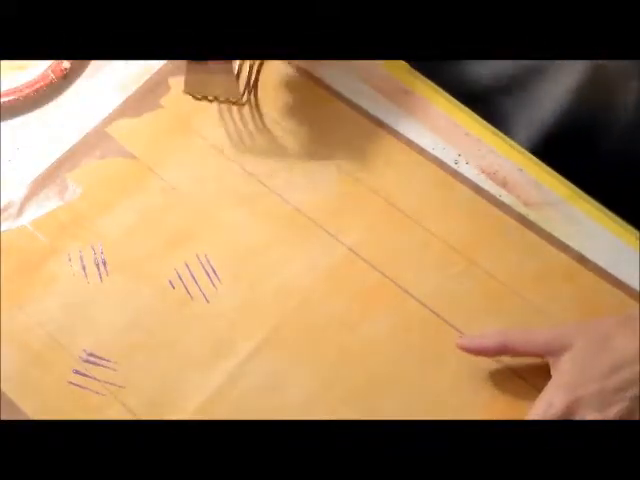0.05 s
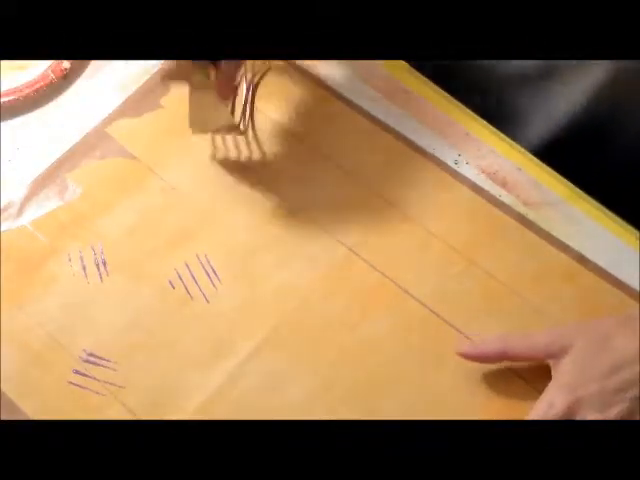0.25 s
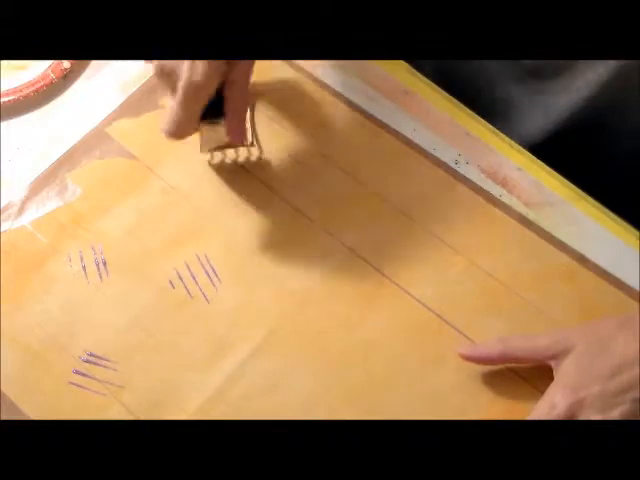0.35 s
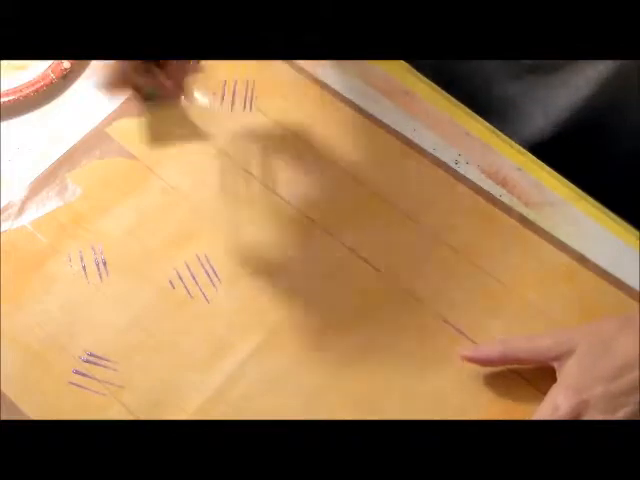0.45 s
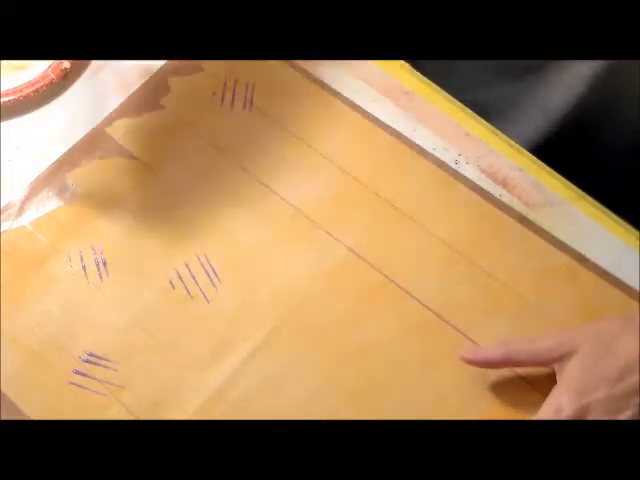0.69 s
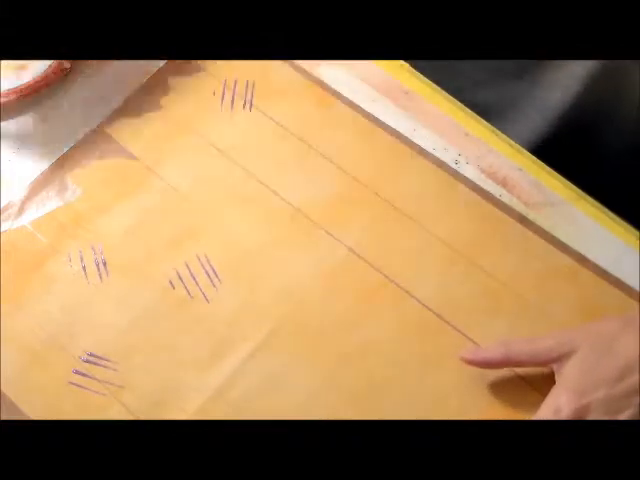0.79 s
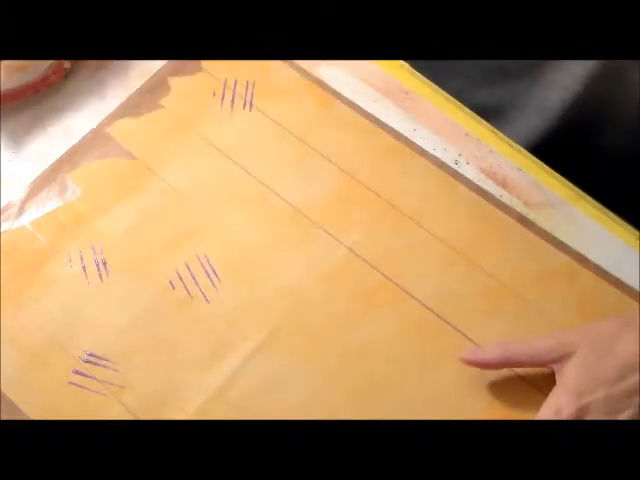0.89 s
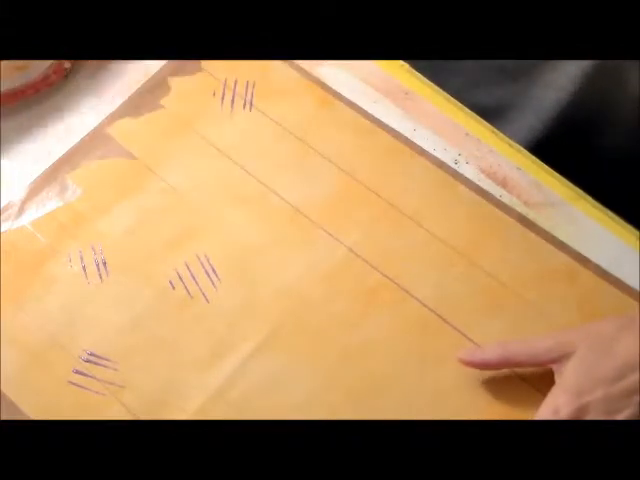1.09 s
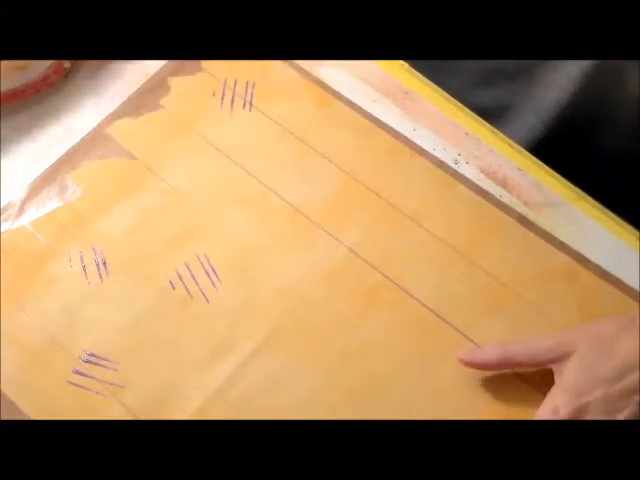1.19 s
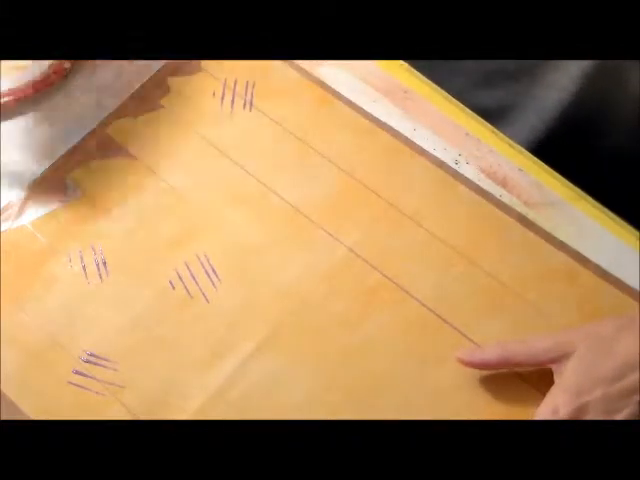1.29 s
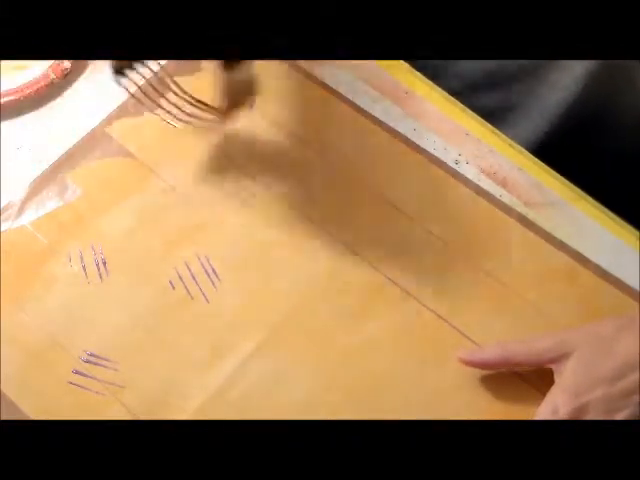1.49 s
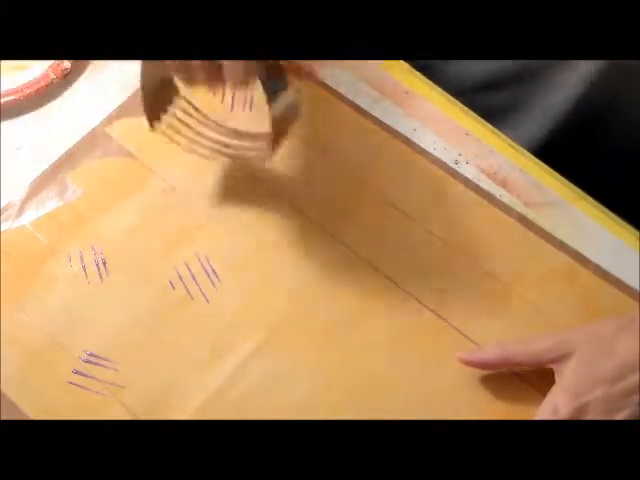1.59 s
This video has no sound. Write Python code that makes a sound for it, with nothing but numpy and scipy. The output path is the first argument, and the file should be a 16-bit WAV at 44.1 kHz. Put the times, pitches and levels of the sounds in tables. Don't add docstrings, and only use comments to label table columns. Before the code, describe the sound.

Dull thud of a wire hand tool on a papered table, then two sharp metallic clacks indoors

```python
import sys
import numpy as np
from scipy import signal
from scipy.io import wavfile
from scipy.ndimage import uniform_filter1d

SR = 44100
rng = np.random.default_rng(int(sys.argv[2]) if len(sys.argv) > 2 else 0)


def pcm_store(signal):
    levels = np.round(np.clip(np.atleast_2d(signal), -1, 1) * 32767)
    wavfile.write(sys.argv[1], SR, levels.astype(np.int16).T)


def magnitude_from_level(level_db):
    exponent = np.asarray(level_db, float) / 20
    return 10 ** exponent


N = 72765

# (frequency [Hz], level [dB per Hz])
AIR_COLOUR = [(15, -20.5), (25, 4.5), (191, -15.5), (219, -17), (335, -17.5), (394, -22.5), (5420, -34.5),
              (13500, -37), (15000, -33)]
AIR_DB, HISS_EDGE_HZ = -51, 14300
# (frequency [Hz], likeness [0-1])
AIR_LIKENESS = [(30, 0.83), (300, 0.44), (1400, 0.21), (3500, 0.11), (7000, 0.031), (15000, 0.022)]
# (frequency [Hz], left minus right [dB])
AIR_LEAN = [(30, 10), (200, 3), (400, 0), (1000, 0.2)]
# (time [s], level [dB])
ARM_LEANING = [
    (0, 1),
    (.12, 2),
    (.3, 1.5),
    (.47, 6.5),
    (.6, -0.5),
    (.85, -0.5),
    (1.05, 1),
    (1.5, 5.5),
    (1.62, 1),
]
LEANING_HZ = 138
# (time [s], level [dB])
HUM_SWELL = [(0, -76), (.5, -75), (.75, -62), (1.05, -64), (1.2, -68), (1.65, -75)]
HUM_HZ, HUM_WIDTH_HZ = 337, 6.2
# (time [s], length [s], level [dB], centre [Hz])
RUSTLES = [(0.11, 0.11, -67, 3700), (1.182, 0.04, -57, 3600), (0., 0.055, -59, 2200),
           (.595, 0.028, -54, 2300), (.208, .035, -52, 3200), (1.185, .035, -62, 9000)]
# (time [s], level [dB])
LENS_STEPS = [(0.034, -52.5), (0.146, -66), (0.288, -62), (0.433, -55), (0.901, -53.5), (0.9663, -56.5),
              (1.035, -55), (1.167, -58), (1.233, -55.5), (1.6346, -53.5)]
# (frequency [Hz], level [dB], time to fall 60 dB [s])
LENS_MODES = [(2860, 4, 0.038), (3866, -9, 0.1)]
# (start [s], end [s], start pitch [Hz], end pitch [Hz], level [dB])
LENS_WHINE = [
    (0.035, 0.205, 5410, 5300, -73),
    (0.243, 0.355, 5330, 5290, -71.5),
    (0.635, 1.027, 5380, 5230, -71),
]
# (time [s], level [dB], frequency [Hz], time to fall 60 dB [s], left minus right [dB])
TICKS = [(0.2051, -38, 3900, 0.006, 2), (0.417, -48, 3500, 0.0036, -3), (.4195, -55, 4840, .02, 0),
         (0.441, -58, 4340, 0.077, 3.5), (0.454, -49, 3500, 0.0046, 0), (.455, -50.5, 9100, 0.0046, 0),
         (0.461, -57, 9500, .006, 0), (0.5303, -43, 4100, .006, 2), (.5305, -44, 4700, .006, 1),
         (0.5942, -36.5, 3110, .022, -2), (0.5943, -42.5, 2470, 0.017, 3), (0.594, -38.5, 4660, .01, 1),
         (.596, -44.5, 1790, 0.016, 3), (0.6018, -41.5, 2920, 0.021, 0), (0.6023, -46, 4160, 0.012, 0),
         (0.602, -45.5, 1685, 0.015, 0), (0.608, -48, 3200, 0.01, 0), (0.6335, -38, 2830, .011, 6),
         (0.6328, -44, 3750, 0.008, 16), (0.6323, -44, 4600, 0.0067, 4), (.6336, -49, 6000, .004, 4),
         (0.6479, -42, 11740, .005, -5), (0.6477, -42, 14200, .003, -11), (0.65, -50, 10800, 0.0053, -5),
         (1.0881, -42, 3300, .008, 2), (1.0888, -38, 3780, 0.01, 2), (1.091, -42, 4530, .008, 2),
         (1.0984, -31, 4700, .008, 2), (1.1113, -36, 4660, .006, 0), (1.3254, -41, 10400, 0.0052, 0),
         (1.336, -40, 9450, .005, 0), (1.3464, -38, 6960, .006, 0), (0.2143, -43, 3720, .012, 0),
         (1.319, -27, 1740, .03, 0), (1.3187, -33, 4950, .012, 0), (1.203, -55, 4050, .02, 0),
         (1.1866, -43.5, 3350, 0.0076, 0), (1.185, -53, 1810, 0.011, 0)]
TICK_AIR_DB, TICK_ROOM_DB = -26, -13
# (time [s], table level [dB], push length [s], crack level [dB], brightness [Hz])
TAPS = [
    (0.2112, -22.5, 0.0019, -31.5, 1400),
    (1.0922, -28.5, 0.00099, -27, 17700),
    (1.318, -22.5, 0.00058, -26, 17200),
]
# (frequency [Hz], level [dB], time to fall 60 dB [s], left minus right [dB])
PAPER_MODES = [(108.5, -3, 0.055, 11.5), (198, -19.5, .28, 8), (217.7, -10.5, 0.22, 6),
               (366, -24.5, 0.21, -3), (412, -2.5, 0.09, 5), (472, -4, 0.15, -2), (539, -9, 0.12, 4),
               (660, -13, 0.25, 8), (750, -5, 0.06, 1), (910, -18, .07, -1), (1116, -13, 0.067, -4),
               (1210, -2, 0.091, -5)]
PLATE_MODES = [(113, -0.5, 0.063, 13), (172.6, 0, 0.072, 5.5), (347, -17, 0.12, 3), (444.7, 0, .08, 3.5),
               (515, -7, 0.18, -1), (598, -12, 0.14, -4), (722, -1.5, 0.048, 1), (780, -5, .1, -3),
               (978, -21, 0.14, -6), (1117, -14, 0.099, -2), (1640, -23, 0.17, -2)]
RIM_MODES = [(109.3, -1.5, 0.082, 7.5), (168.3, -1.5, 0.11, 10), (193.6, -2.5, 0.09, 3), (203, -17, .3, 3),
             (232, -13.5, 0.15, 5), (362, -8, 0.09, 5), (465, 4, 0.05, 2), (500, -22, .4, 2),
             (573, -13, .14, 3), (729, -6.5, 0.061, -2), (771, -16, .14, -1), (1010, -12, 0.074, -1),
             (1190, -12, 0.05, 3), (1640, -28, 0.12, 2)]
PUSH_RISE_S = 0.00039
REBOUND_S, REBOUND_DB = 0.0166, -8.5
# (frequency [Hz], level [dB], time to fall 60 dB [s])
ROCK_MODES = [(35.78, -19.5, 0.64), (45.6, 1, 0.15)]
ROCK_DB = [-12.5, -18, -13.5]
ROCK_LATE_S, ROCK_RISE_S, ROCK_RIGHT_LEAD_S, ROCK_LEAN_DB = 0.0053, 0.014, 0.0028, 12.5
# (frequency [Hz], level [dB], time to fall 60 dB [s])
TINE_MODES = [(1827, 9, 0.016), (2580, -5, .012), (2855, -2, 0.012), (3316, 12.5, 0.0084),
              (4400, 3.5, 0.014), (4990, -4.5, 0.012), (8840, -1.5, 0.013), (9900, -2.5, 0.0065),
              (11000, -3, .008)]
# (frequency [Hz], level [dB])
SNAP_COLOUR = [(900, -4), (1350, -1), (1800, -1), (2400, -4), (4800, -1), (6300, -12.5), (9800, 0),
               (15000, -11)]
RING_DB = [-18, -5, -4]
SMACK_DB = [14.5, 19, 20]
LANDING_S, CHATTER_S, CHATTER_DB, SNAP_DB = 0.003, 0.017, -12, -7
LEFT_LAG = 1
# (time [s], level [dB])
TINE_CONTACTS = [(1.0932, -33), (1.0942, -34), (1.0973, -43.5), (1.099, -44), (1.3181, -36.5), (1.32, -31),
                 (1.3248, -54)]
CONTACT_RISE_S = 0.0006
# (frequency [Hz], time to fall 60 dB [s])
ROOM_DECAY = [(200, 0.36), (1000, 0.27), (3000, 0.18), (7000, 0.18), (14000, 0.11)]
# (frequency [Hz], likeness [0-1])
ROOM_LIKENESS = [(300, 0.93), (2500, 0.84), (6000, 0.21), (14000, 0.17)]
ROOM_DB = 0
# (time [s], length [s], level [dB], start pitch [Hz], end pitch [Hz])
SETTLES = [
    (.228, .026, -41, 410, 465),
    (.255, .032, -46, 425, 430),
    (.25, .032, -50, 765, 770),
    (.287, .026, -53, 450, 470),
    (1.119, .044, -40.5, 445, 440),
    (1.347, .062, -37, 435, 475),
    (1.424, .024, -49, 480, 495),
]
DUCK_S, DUCK_DB, DUCK_FALL_S, RECOVER_S = 1.339, -7, 0.16, 9.1
BASS_CUT_HZ, EDGE_HZ = 16.5, 14500


def read(points, hz):
    f, value = np.transpose(points)
    return np.interp(np.log(hz + 1), np.log(f + 1), value)


def evened(x):
    return x / np.sqrt(np.mean(x ** 2) + 1e-20)


def add(mix, s, sound):
    part = mix[..., round(s * SR):][..., :sound.shape[-1]]
    part += sound[..., :part.shape[-1]]


def ring(hz, db, t60, length=.4):
    t = np.arange(int(length * SR)) / SR
    return magnitude_from_level(db - 60 * t / t60) * np.sin(2 * np.pi * hz * t)


def glide(hz):
    return np.sin(2 * np.pi * np.cumsum(hz) / SR)


def sides(lean_db):
    return magnitude_from_level(np.array([[.5], [-.5]]) * lean_db)


def pair(same, shape_db):
    a, b, c, d = rng.standard_normal((4,) + shape_db.shape)
    same = np.clip(same, 0, 1)[:, None]
    left = a + 1j * b
    right = same * left + np.sqrt(1 - same ** 2) * (c + 1j * d)
    return np.array([left, right]) * magnitude_from_level(shape_db)


def air():
    hz = np.fft.rfftfreq(2048, 1 / SR)
    patches = rng.standard_normal((1025, N // 512 + 5))
    patches = evened(uniform_filter1d(uniform_filter1d(patches, 20, 0), 5, 1))
    arm_db = np.interp(np.arange(patches.shape[1]) * 512 / SR, *np.transpose(ARM_LEANING))
    stir_db = arm_db / (1 + (hz[:, None] / LEANING_HZ) ** 4)
    z = pair(read(AIR_LIKENESS, hz), read(AIR_COLOUR, hz)[:, None] + 1.25 * patches + stir_db)
    z = z * magnitude_from_level(np.array([.5, -.5])[:, None, None] * read(AIR_LEAN, hz)[:, None])
    z = z * (hz < HISS_EDGE_HZ)[:, None]
    noise = signal.istft(z, nperseg=2048, noverlap=1536)[1][:, :N]
    return magnitude_from_level(AIR_DB + 4.0) * evened(noise)


def hum():
    t, r = np.arange(N) / SR, np.exp(-np.pi * HUM_WIDTH_HZ / SR)
    wander = rng.standard_normal(N) + 1j * rng.standard_normal(N)
    slow = signal.lfilter([1], [1, -r], wander) * np.sqrt(1 - r ** 2) + 0.76
    tone = (slow * np.exp(2j * np.pi * HUM_HZ * t)).real
    return magnitude_from_level(np.interp(t, *np.transpose(HUM_SWELL))) * evened(tone)


def rustles():
    out = np.zeros((2, N))
    for s, length, db, hz in RUSTLES:
        size = int(length * SR)
        grains = magnitude_from_level(2 * rng.exponential(1, size=50).repeat(100))
        grit = rng.standard_normal((2, 5000)) * grains
        band = signal.butter(2, [0.6 * hz, min(1.6 * hz, 20000)], "band", fs=SR, output="sos")
        grit = signal.sosfilt(band, grit)[:, :size]
        add(out, s, magnitude_from_level(db) * evened(grit) * np.hanning(size))
    return out


def lens():
    out = np.zeros(N)
    ping = sum(ring(*mode, 0.19) for mode in LENS_MODES)
    ping = ping * np.minimum(np.arange(len(ping)) / (0.0023 * SR), 1)
    for s, db in LENS_STEPS:
        add(out, s - .001, magnitude_from_level(db) * ping)
    t = np.arange(N) / SR
    flutter = evened(uniform_filter1d(rng.standard_normal(N), 500))
    for s, end, hz, end_hz, db in LENS_WHINE:
        on = np.clip(np.minimum(t - s, end - t) / .01, 0, 1)
        out += on * magnitude_from_level(db + 3.5 * flutter) * glide(np.interp(t, [s, end], [hz, end_hz]))
    return sides(3.6) * out


def ticks():
    out = np.zeros((2, N))
    for s, db, hz, t60, lean_db in TICKS:
        burst = rng.standard_normal(60) * np.exp(-np.arange(60) / 16.0)
        if hz < 6000:
            burst[:4] += 2.5 * np.hanning(6)[1:5]
        snap = np.convolve(burst, ring(hz, 0, t60, .08))
        snap = snap / abs(snap).max()
        snap[1:60] += magnitude_from_level(TICK_AIR_DB) * np.diff(burst)
        add(out, s, sides(lean_db) * magnitude_from_level(db) * snap)
    return out


def table():
    out, t = np.zeros((2, N)), np.arange(int(.04 * SR)) / SR
    rock = -sum(ring(*mode, 0.62) for mode in ROCK_MODES)
    rock = sides(ROCK_LEAN_DB) * rock * (1 - np.exp(-np.arange(len(rock)) / (ROCK_RISE_S * SR)))
    boards = (PAPER_MODES, PLATE_MODES, RIM_MODES)
    for (s, db, push_s, _, _), modes, rock_db in zip(TAPS, boards, ROCK_DB):
        body = sum(sides(lean) * ring(hz, level, t60, .6) for hz, level, t60, lean in modes)
        since = np.maximum([t, t - REBOUND_S], 0)
        pushes = (1 - np.exp(-since / PUSH_RISE_S)) * np.exp(-(since / push_s) ** 2)
        push = magnitude_from_level([0, REBOUND_DB]) @ pushes
        add(out, s, magnitude_from_level(db) * signal.fftconvolve(body, push[None] / (.5 * push_s * SR)))
        late = s + ROCK_LATE_S
        add(out[0], late, magnitude_from_level(rock_db) * rock[0])
        add(out[1], late - ROCK_RIGHT_LEAD_S, magnitude_from_level(rock_db) * rock[1])
    return out


def tines():
    body = sum(ring(*mode, .05) for mode in TINE_MODES)
    rings, snaps, smacks = np.zeros((3, N))
    hz = np.linspace(0, SR / 2, 65)
    colour = signal.firwin2(255, np.linspace(0, 1, 65), magnitude_from_level(2 * read(SNAP_COLOUR, hz)))
    colour = signal.minimum_phase(colour)
    t = np.arange(int(.06 * SR)) / SR
    for (s, _, _, db, bright_hz), ring_db, smack_db in zip(TAPS, RING_DB, SMACK_DB):
        hits = rng.standard_normal(len(t)) * (.4 + (rng.random(len(t)) < .15))
        force = hits * ((t < LANDING_S) + magnitude_from_level(CHATTER_DB) * np.exp(-t / CHATTER_S))
        dull = signal.butter(2, min(bright_hz, 20000), fs=SR, output="sos")
        force = signal.sosfilt(dull, force)
        smack = signal.sosfilt(dull, np.r_[colour, 0 * colour, 0 * colour])
        add(smacks, s, magnitude_from_level(db + smack_db) * smack / np.linalg.norm(smack))
        force = force / np.sqrt(np.mean(force[:130] ** 2))
        add(snaps, s + .0005, magnitude_from_level(db + SNAP_DB) * np.convolve(force, colour / np.linalg.norm(colour)))
        add(rings, s + 0.00062, magnitude_from_level(db + ring_db - 18.5) * np.convolve(0.091 * force, body))
    soft = sum((-1) ** k * ring(*mode, .05) for k, mode in enumerate(TINE_MODES))
    soft = soft * (1 - np.exp(-t[:len(body)] / CONTACT_RISE_S))
    for s, db in TINE_CONTACTS:
        add(rings, s, magnitude_from_level(db) * soft)
    return rings, snaps, smacks


def room(x):
    hz, t = np.fft.rfftfreq(128, 1 / SR), np.arange(600) * 32 / SR
    z = pair(read(ROOM_LIKENESS, hz), -60 * t / read(ROOM_DECAY, hz)[:, None])
    tail = signal.istft(z, nperseg=128, noverlap=96)[1]
    tail = tail * np.clip(np.arange(tail.shape[1]) / SR / 0.0016 - .5, 0, 1)
    return signal.fftconvolve(x[None], tail / np.linalg.norm(tail[0]), axes=1)[:, :N]


def settles():
    out = np.zeros(N)
    for s, length, db, hz, end_hz in SETTLES:
        size = int(length * SR)
        add(out, s, magnitude_from_level(db) * np.sqrt(np.hanning(size)) * glide(np.linspace(hz, end_hz, size)))
    return out


def scene():
    small = ticks()
    rings, snaps, smacks = tines()
    crack = rings + snaps
    to_walls = magnitude_from_level(ROOM_DB) * (smacks + 0.24 * snaps + .2 * rings) + magnitude_from_level(TICK_ROOM_DB) * small.mean(0)
    background = air() + hum() + rustles() + lens()
    blows = table() + np.array([np.roll(crack, LEFT_LAG), crack]) + room(to_walls)
    return background + small + blows + settles()


def top_cut(x):
    return signal.sosfilt(signal.butter(12, 15530, fs=SR, output="sos"), x)


def record(dry):
    after = np.maximum(np.arange(N) / SR - DUCK_S, 0)
    gain_db = DUCK_DB * (1 - np.exp(-after / DUCK_FALL_S)) * np.exp(-after / RECOVER_S)
    treble_cut = signal.butter(14, EDGE_HZ, fs=SR, output="sos")
    bass_cut = signal.butter(1, BASS_CUT_HZ, "high", fs=SR, output="sos")
    mix = signal.sosfilt(np.vstack([treble_cut, bass_cut]), dry * magnitude_from_level(gain_db))
    return top_cut(mix)


dry = scene()
out = record(dry)
pcm_store(out)
```